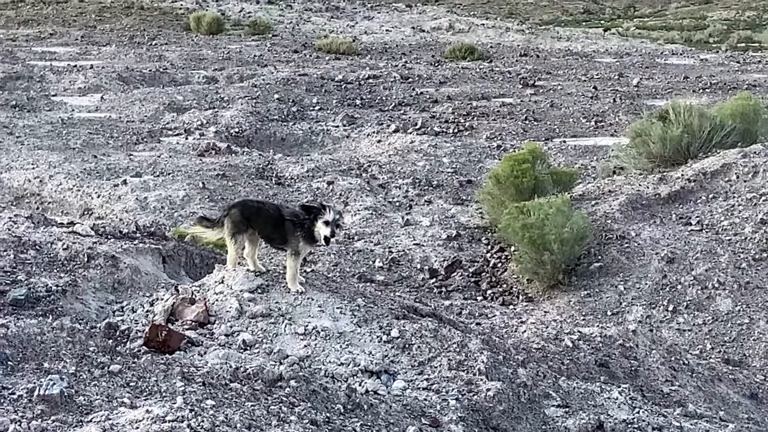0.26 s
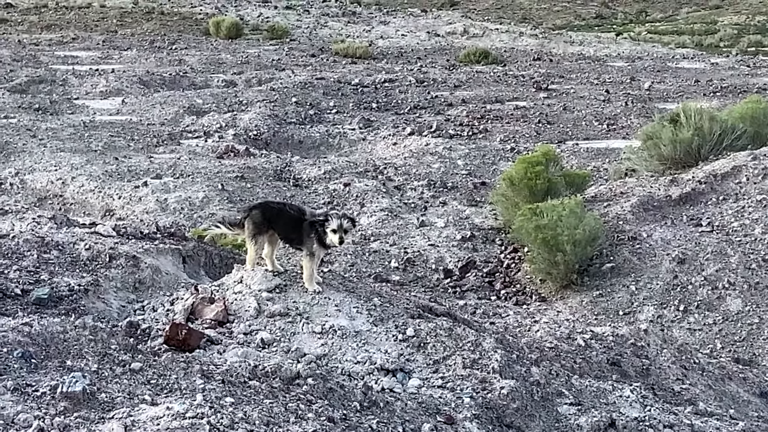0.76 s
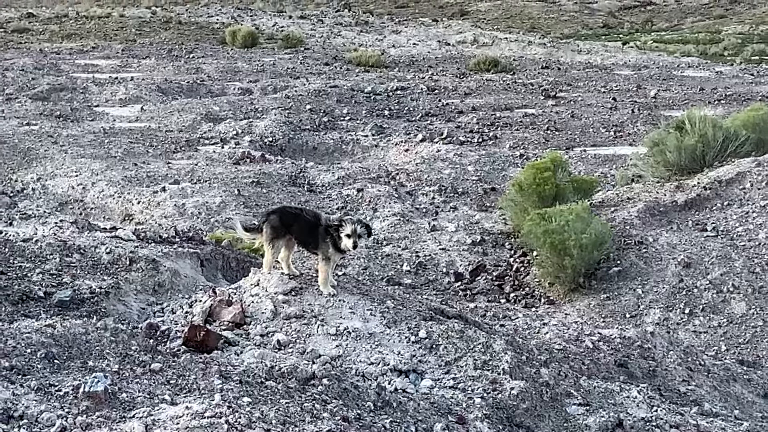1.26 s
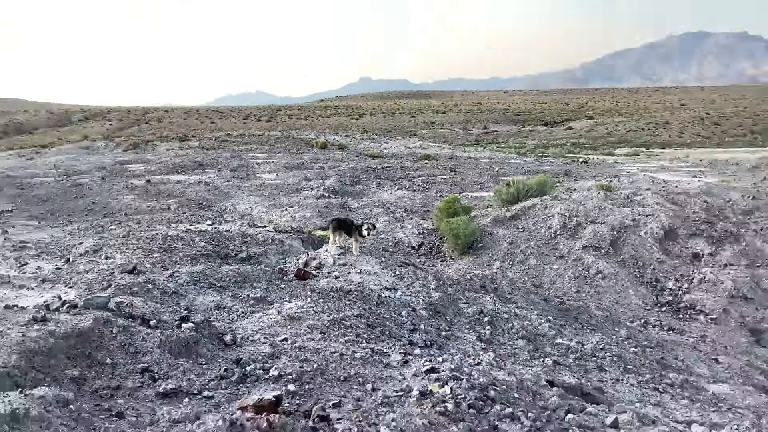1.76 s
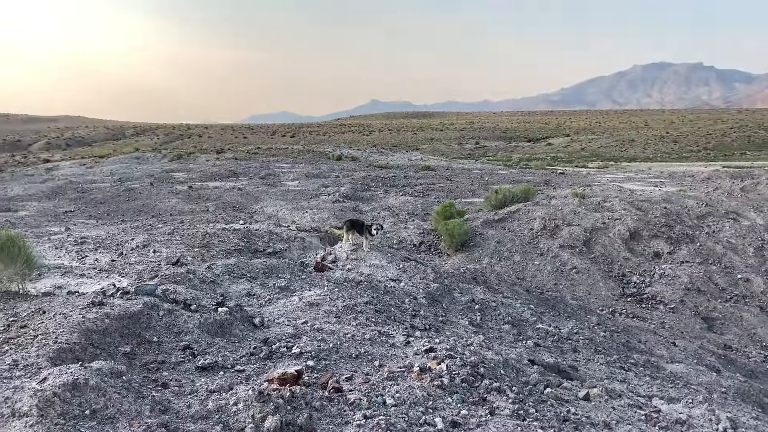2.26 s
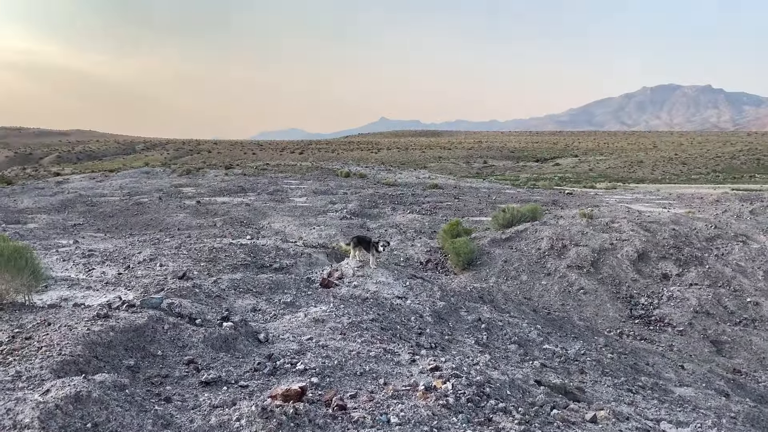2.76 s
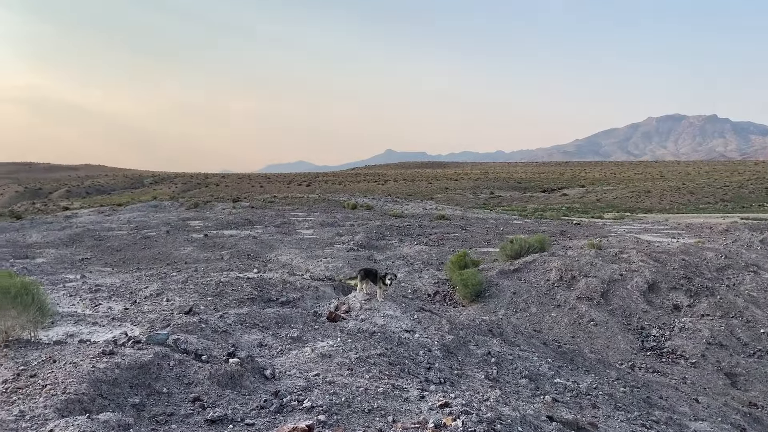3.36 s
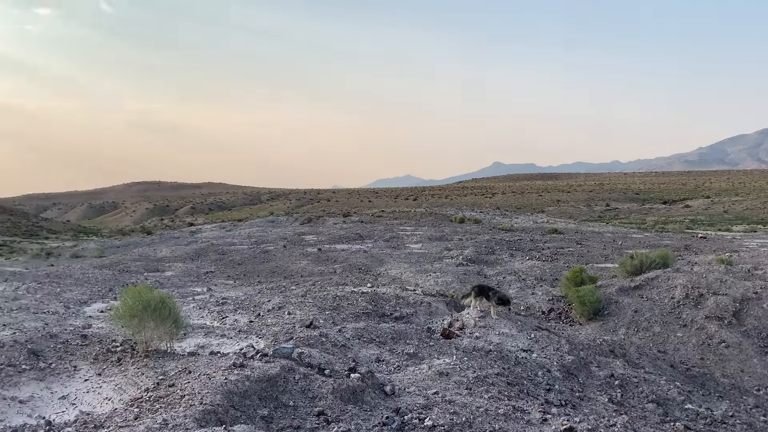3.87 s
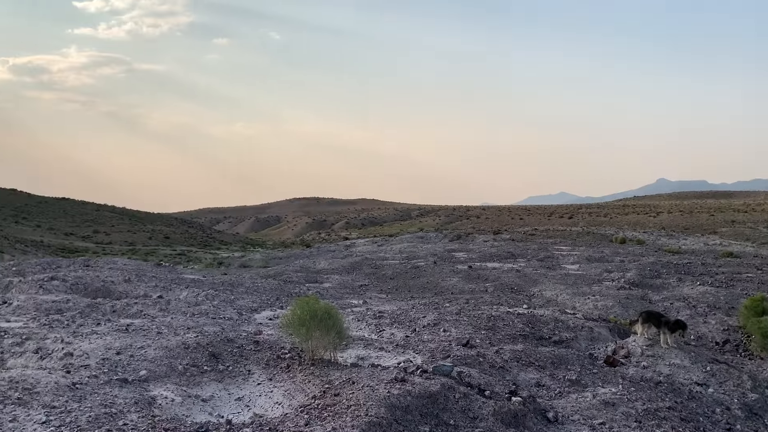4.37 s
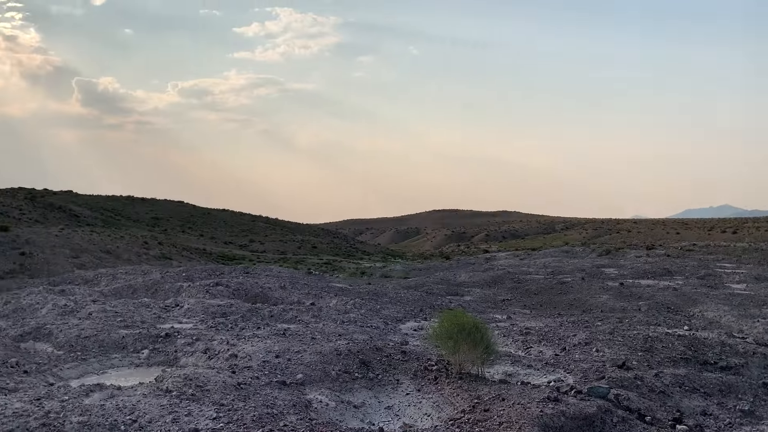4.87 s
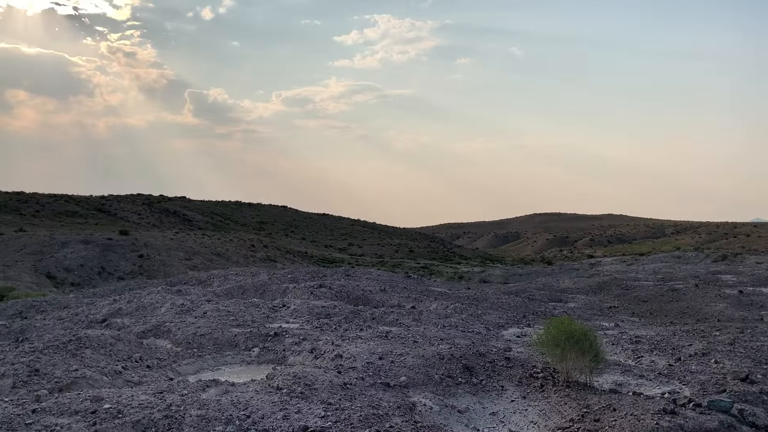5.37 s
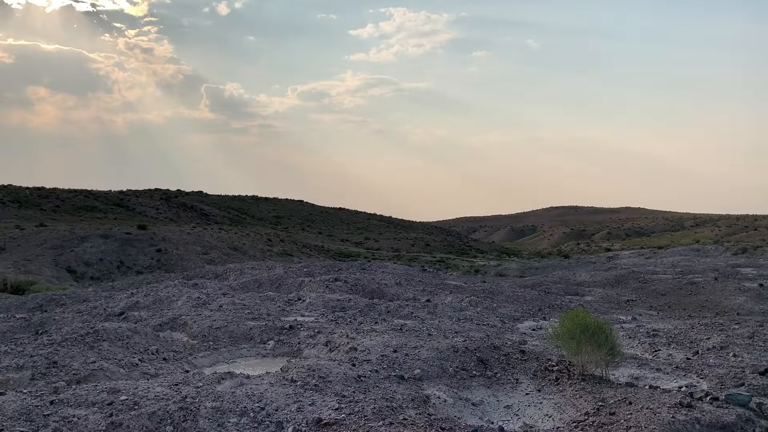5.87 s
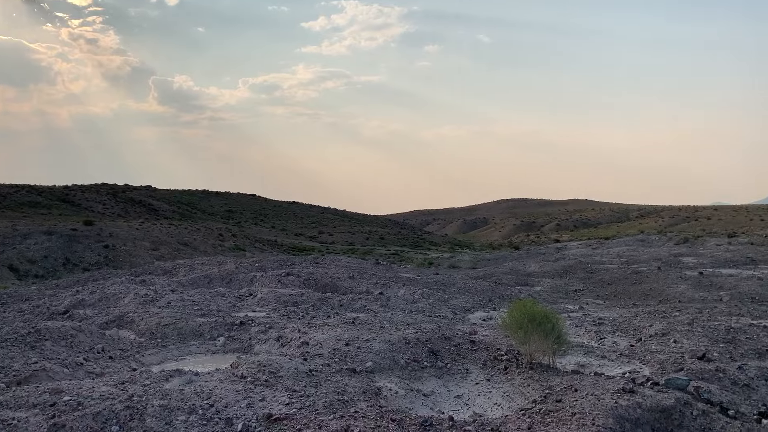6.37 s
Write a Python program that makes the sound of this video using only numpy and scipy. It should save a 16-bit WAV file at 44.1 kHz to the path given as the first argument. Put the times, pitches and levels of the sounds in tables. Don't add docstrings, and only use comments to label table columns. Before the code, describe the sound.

Outdoors on bare stony ground, uneven wind rumbles directly on a hand-held phone microphone. A cluster of thumps comes around one second, then calmer air. A stone clicks at about 2.4 s and a short gravelly crunch with cloth rustle follows just before 3 s. Wind flutters on, drops to a lull, and returns with heavy buffets, the hardest at about 6.1 s. Faint hiss lies beneath.

```python
import sys
import numpy as np
from scipy import signal
from scipy.fft import rfft, irfft, next_fast_len
from scipy.io import wavfile
from scipy.ndimage import uniform_filter1d, minimum_filter1d

SR = 44100
rng = np.random.default_rng(int(sys.argv[2]) if len(sys.argv) > 2 else 0)


def decibels_to_gain(level_db):
    exponent = np.asarray(level_db, float) / 20
    return 10 ** exponent


def materialize(psi):
    bounded = np.clip(np.atleast_2d(psi).T, -1, 1)
    quanta = np.round(bounded * 32767).astype(np.int16)
    wavfile.write(sys.argv[1], SR, quanta)


N = 292383


def evened(x):
    return x / np.sqrt(np.mean(x ** 2) + 1e-20)


def read(points, hz):
    f, value = np.transpose(points)
    return np.interp(np.log(hz + 1), np.log(f + 1), value)


def coloured(x, points):
    size = next_fast_len(x.shape[-1] + 4096)
    gain = decibels_to_gain(read(points, np.fft.rfftfreq(size, 1 / SR)))
    return irfft(rfft(x, size) * gain, size)[..., :x.shape[-1]]


def band(x, lo_hz, hi_hz, order=3):
    return signal.sosfilt(signal.butter(order, [lo_hz, hi_hz], "band", fs=SR, output="sos"), x)


def low_pass(x, hz, order):
    return signal.sosfilt(signal.butter(order, hz, fs=SR, output="sos"), x)


def high_pass(x, hz, order):
    return signal.sosfilt(signal.butter(order, hz, "high", fs=SR, output="sos"), x)


def panned(db):
    return decibels_to_gain(np.array([db / 2, -db / 2]))


def openings(rows, gains):
    out = np.zeros((len(gains[0]), N))
    for row, gain in zip(rows, gains):
        out[:, round(row[0] * SR):round(row[1] * SR)] = gain[:, None]
    return uniform_filter1d(out, size=500, axis=1)


# (frequency [Hz], gain [dB])
HISS_COLOUR = [(300, 6), (900, 3.5), (1400, 6.5), (2300, 5.5), (4000, 0.5), (7000, 1.5), (9000, -1.5),
               (11000, 2), (13500, 0), (16000, -4.5)]
# (start [s], end [s], level [dB])
TOP_HISS_GATES = [
    (0.999, 1.061, -73),
    (1.21, 1.378, -71.5),
    (1.456, 1.561, -81),
    (2.441, 2.549, -81.5),
    (2.575, 2.616, -80),
    (2.641, 2.853, -85.5),
    (3.72, 3.85, -91),
    (5.48, 5.494, -74),
    (6.07, 6.194, -76),
    (6.243, 6.297, -80),
]


def hiss():
    raw = rng.standard_normal((3, N))
    bed = evened(coloured(raw[:2] + 0.13 * raw[2], HISS_COLOUR))
    top = evened(high_pass(bed[:, ::-1], 7900, order=6))
    gate = openings(TOP_HISS_GATES, [decibels_to_gain(np.array([db])) for _, _, db in TOP_HISS_GATES])
    return decibels_to_gain(-78) * bed + gate * top


# (time [s], level [dB])
SCRUB_LEVEL = [(0, -88.5), (1.1, -82), (1.4, -64.5), (1.7, -79.5), (2.2, -79), (2.62, -72.5), (3.4, -74.5),
               (3.86, -71), (3.95, -86.5), (4.42, -74.5), (4.7, -89), (6.63, -83.5)]


def scrub():
    raw = rng.standard_normal((3, N))
    s, db = np.transpose(SCRUB_LEVEL)
    rush = evened(band(raw[2] + .3 * raw[:2], 620, 1300, order=6))
    return decibels_to_gain(np.interp(np.arange(N) / SR, s, db)) * rush


# (start [s], end [s], level [dB], left over right [dB], grit pitch [Hz])
RUSTLES = [(1.022, 1.064, -79.5, -2.7, 3520), (1.221, 1.387, -84, 1, 2980), (1.45, 1.559, -72, -0.5, 4400),
           (1.67, 1.72, -77, -1.3, 3500), (1.73, 1.765, -79, -1, 4100), (1.775, 1.81, -76, -1, 3900),
           (1.866, 2.021, -89, -1, 3480), (2.318, 2.36, -82.5, -10.5, 2610), (2.43, 2.5, -67.5, -1.5, 4150),
           (2.5, 2.56, -70, -1.5, 4150), (2.56, 2.621, -68, -1.5, 4200), (2.638, 2.704, -77.5, -7, 2890),
           (2.72, 2.775, -75, 1, 2900), (2.775, 2.819, -71, 1, 4210), (2.819, 2.836, -62, -1.5, 4600),
           (2.836, 2.853, -50.5, -1.5, 4600), (2.853, 2.867, -58, -1.5, 4600),
           (2.867, 2.902, -79.5, -2.5, 3450), (3.094, 3.16, -81.5, 6.5, 4600),
           (3.275, 3.338, -82.5, 8.5, 4490), (3.57, 3.64, -83, -1, 5900), (3.64, 3.72, -81, -1, 5900),
           (3.72, 3.855, -77, 2, 5600), (4.174, 4.451, -86.5, -5, 4480), (5.844, 5.907, -80.5, 11.5, 4460),
           (6.078, 6.185, -79, 12.5, 3500), (6.243, 6.297, -77, 1.5, 3480)]
# (multiple of the pitch
# [ratio], gain [dB])
GRIT_COLOUR = [(.15, -9), (.5, -4), (.7, -7), (1.1, 0), (1.27, -14), (1.45, -6), (1.76, -11), (2, -3),
               (2.4, -20), (5, -35)]
# (multiple of the pitch [ratio], gain [dB])
CLOTH_COLOUR = [(.2, -14), (.4, -12), (.8, -13), (1, 0), (1.15, -3), (1.35, -6), (1.6, -20), (3, -35)]


def rustle():
    finest_hz, margin = 5000, 200
    level = openings(RUSTLES, [decibels_to_gain(row[2]) * panned(row[3]) for row in RUSTLES])
    grains = rng.standard_normal((2, N)) * decibels_to_gain(1.6 * rng.exponential(1, N))
    grains += 0.057 * grains[::-1]
    for start, end, *_, hz in RUSTLES:
        span = slice(round(start * SR) - margin, round(end * SR) + margin)
        colour = GRIT_COLOUR if hz < finest_hz else CLOTH_COLOUR
        spectrum = [(k * hz, db) for k, db in colour]
        grains[:, span] = evened(coloured(grains[:, span], spectrum))
    smooth = uniform_filter1d(rng.standard_normal(N), size=500)
    patchy = evened(uniform_filter1d(smooth, size=500))
    return decibels_to_gain(4.5 + 1.1 * patchy) * level * grains


# (time [s], peak level [dB], pitch [Hz], half length [s])
PEBBLES = [
    (.281, -78, 1800, .002),
    (.289, -76, 1750, .002),
    (.302, -66, 1700, .003),
    (.317, -72, 1900, .003),
    (1.872, -66, 1700, .002),
    (1.985, -68, 1150, .008),
    (2.357, -48, 1050, .004),
    (2.671, -58, 2600, .003),
    (2.793, -60, 2950, .005),
    (2.844, -44, 1000, .003),
]


def pebbles():
    out, t = np.zeros(N), np.arange(-800, 800) / SR
    noise = rng.standard_normal((len(PEBBLES), len(t)))
    for (s, db, hz, half), raw in zip(PEBBLES, noise):
        rough = evened(band(raw, .7 * hz, 1.35 * hz, order=2))
        knock = np.sin(2 * np.pi * hz * t) + .6 * rough
        swell = np.exp(-(t / max(half, 5e-4)) ** 2)
        out[round(s * SR) - 800:][:len(t)] += decibels_to_gain(db) * knock * swell
    return out * panned(-2.5)[:, None]


# (time [s], peak level [dB], pitch [Hz], left over right [dB], crunch length [s])
STONES = [(0.355, -72, 2300, -0.5, 0.001), (3.096, -62, 2000, 6, .001), (3.118, -66, 1900, 6, .001),
          (1.874, -60, 1610, 6, 0.0027), (2.353, -35.5, 2240, -4.5, 0.0026),
          (2.671, -48, 1950, -3.5, 0.0058), (2.735, -65, 1790, 2, 0.0053), (2.791, -48, 2980, -2.5, 0.0073),
          (2.824, -44, 1570, -9.5, 0.005), (2.8411, -32.5, 1780, -1, 0.0046),
          (2.8426, -39, 3640, 1.5, 0.0027), (5.076, -68, 1640, 7.5, 0.0024)]
# (frequency [Hz], gain [dB])
STONE_COLOUR = [(500, 1), (1500, 4), (3000, 1.5), (6000, -13), (9000, -19), (15000, -23.5)]


def stones():
    out, t = np.zeros((2, N + SR)), np.arange(4000) / SR
    draws = rng.random((len(STONES), 3, len(t)))
    for (s, db, hz, pan_db, length), (chance, left, right) in zip(STONES, draws):
        grains = (chance < .12) * (np.array([left, right]) - .5)
        grit = grains * 2.5 * np.exp(-t / max(length, 1e-3))
        grit[:, 0] = 1
        ring = 0.11 * np.sin(2 * np.pi * hz * t) * np.exp(-t / .0015)
        out[:, round(s * SR):][:, :len(t)] += decibels_to_gain(db) * panned(pan_db)[:, None] * (grit + ring)
    return decibels_to_gain(11.5) * coloured(out[:, :N], STONE_COLOUR)


# (time [s], strength [dB], air speed as body over rumble [dB])
GUSTS = [(0.0, -20, -28.5), (0.499, -26, -23.5), (.9, -22.5, -17), (1.301, -17, -10), (1.73, -28, -14),
         (2.15, -21, -21), (2.45, -27.5, -12.5), (2.72, -19, -10.5), (3.38, -21, -6), (3.48, -25, -21.5),
         (3.849, -21, -14), (4.0, -25.5, -34), (4.552, -21.5, -16.5), (4.68, -39, -16.5),
         (5.199, -34, -28.5), (5.549, -17.5, -9.5), (6.199, -20.5, -8), (6.63, -22, -16.5)]
# (time [s], push [dB], speed-up [dB], fall [s])
SWELLS = [(.41, 4.5, 4, 0.072), (.56, 0, -7.5, 0.03), (.66, -0.7, 19.5, .025), (1.02, 4.5, -1.5, 0.011),
          (1.46, 11, 0.9, 0.079), (5.69, -3, -11.5, 0.073), (1.938, 3, 10, 0.032), (2.231, -1, 13.5, 0.072),
          (2.421, -3.8, -7.5, 0.044), (2.574, 20.5, -13, 0.013), (2.861, -9, -4, 0.066),
          (6.42, 0.1, -2, 0.091), (3.12, 3.5, -7, 0.028), (3.615, 2, 6, 0.018), (3.82, 3, 7, 0.028),
          (4.171, 0.6, 16.5, 0.1), (4.3, 3.5, 6, 0.023), (0.151, -10, -5, 0.029), (4.45, 4.5, -19, .03),
          (4.51, -7.5, 3, .03), (4.765, 3, 14, 0.025), (4.919, -0.5, -27.5, 0.056), (5.056, 15, 0, 0.02),
          (5.278, 11, 16, 0.011), (5.778, -27, -1, 0.037), (5.853, 9.5, 1, 0.026), (5.931, -6, 16.5, 0.015),
          (5.968, 11, -12, 0.013), (6.145, 11, 7, 0.022), (6.26, 8.5, -4, 0.026)]


def airflow(t):
    s, strength, speed = np.transpose(GUSTS)
    at, push, faster, fall = np.transpose(SWELLS)[:, :, None]
    fall = np.clip(fall, .008, .2)
    rise = 0.89 * fall
    shape = np.exp(-((t - at) / np.where(t < at, rise, fall)) ** 2)
    return np.interp(t, s, strength) + (push * shape).sum(0), np.interp(t, s, speed) + (faster * shape).sum(0)


def turbulence():
    hop, size, bins = 128, 1024, 90
    frames, hz = N // hop + 9, np.fft.rfftfreq(size, 1 / SR)[:, None]
    rumble, speed = airflow(np.arange(frames) * hop / SR)
    body = speed - 5.0
    roar = -36 + 0.98 * speed + .6 * (rumble + 22)
    low = body * np.clip(np.log(hz / 75 + 1e-9) / np.log(215 / 75), 0, 1)
    mid = (roar - body) * np.clip(np.log(hz / 215 + 1e-9) / np.log(630 / 215), 0, 1)
    skirt = -np.maximum(hz - 630, 0) * (.014 - 0.0026 * roar)
    spray = -21 + 0.55 * (roar + 40) - 0.08 * np.maximum(hz - 1300, 0)
    skirt = np.maximum(skirt, spray).clip(max=0)
    flicker = np.tanh(evened(uniform_filter1d(rng.standard_normal(frames), size=4)))
    lumps = (1.2 + 2.0 * np.clip(hz / 450, 0, 1)) * flicker
    level = rumble + low + mid + skirt + lumps - 3.5
    real, imaginary = rng.standard_normal((2, frames, 2, bins)).transpose(0, 2, 3, 1)
    z = np.zeros((2, len(hz), frames), complex)
    z[:, :bins] = (real + 1j * imaginary) * decibels_to_gain(level)[:bins]
    return 2 * signal.istft(z, nperseg=size, noverlap=size - hop)[1][:, :N]


def choppy(x):
    low = signal.sosfiltfilt(signal.butter(2, 190, fs=SR, output="sos"), x)
    chop = signal.sosfiltfilt(signal.butter(4, 55, fs=SR, output="sos"), rng.standard_normal(N))
    return low + (x - low) * decibels_to_gain(9.5 * np.tanh(evened(chop)) - 3.0)


# (time [s], force [dB], bulk over force [dB], snap over force [dB])
BURSTS = [(1, -22.5, 12.5, -24), (1.006, -23.5, 9.5, -17.5), (1.214, -29.5, 1.5, -22.5),
          (1.295, -29.5, 4.5, -17), (1.311, -30, 6.5, -4.5), (1.421, -29, 10, -31), (1.446, -14.5, -3, -12),
          (1.474, -18.5, 2, -17.5), (1.489, -16.5, 5.5, -14), (1.51, -29, 13, -18.5),
          (2.218, -25, 0.5, -25), (2.229, -25.5, 3.5, -33), (2.323, -33, 6.8, -17.5), (2.56, -24, 0.5, -40),
          (2.619, -26, 13, -25), (2.685, -30.5, 15.5, -35.5), (2.754, -29.5, 6.5, -19),
          (3.098, -29.5, 6.5, -30), (5.275, -28.5, 9, -16.5), (5.52, -32, 13.5, -33), (5.55, -16.5, 2, -23),
          (5.843, -24.5, 15, -31), (5.886, -24.5, 5.5, -20), (5.905, -25.5, 2, -21.5),
          (5.952, -25.5, -3.5, -19), (6.09, -15.5, 7, -2), (6.106, -1, -1.5, -12), (6.122, -24, 2.5, -18.5),
          (6.138, -16, -20, -29.5), (6.241, -18.5, 5.5, -16.5)]
# (time [s], force [dB], bulk over force [dB], half length [s])
ROUND_EDDIES = [(0.916, -32.5, 15.5, 0.0056), (.977, -34.5, 24, 0.0014), (1.121, -36.5, 11.5, 0.0027),
                (1.194, -31, -3, 0.0048), (1.28, -39.5, 19, 0.0028), (1.393, -39, 21, 0.0044),
                (1.41, -34, 17, .0022), (1.54, -31, 13, 0.0026), (1.884, -41.5, 16.5, 0.0031),
                (2.292, -33, 9, 0.006), (2.638, -33, 5.5, 0.0013), (2.708, -30, 7.5, 0.0062),
                (2.729, -30, 8, 0.006), (2.786, -32, 5, 0.01), (2.954, -31.5, 1, 0.002),
                (2.974, -29, 13, 0.0043), (3.069, -35, 11, 0.0017), (3.118, -31, 6, 0.0058),
                (3.183, -33.5, 14, 0.0033), (3.365, -35.5, 14, 0.0043), (3.393, -37, .1, 0.0031),
                (4.47, -37, 10, .0033), (5.444, -29, 8.5, 0.0068), (5.466, -31, -17, 0.0063),
                (5.536, -21.5, -4, 0.0024), (5.592, -29, 13.5, 0.0028), (5.931, -36.5, 20.5, 0.0052),
                (6.077, -26, 8.5, 0.0045), (6.153, -23.5, 2, 0.0054), (6.233, -37.5, 17.5, 0.011)]
# (time [s], force [dB], bulk over force [dB])
FLUTTERS = [(0.093, -66, 34.5), (0.64, -64, 28.5), (0.22, -64.5, 29.5), (0.813, -49, 20.5),
            (1.32, -39, 6.5), (5.353, -60, 27), (4.301, -49, 11.5), (1.761, -62, 30.5), (1.96, -56, 20),
            (2.29, -33.5, 5), (6.618, -45, 15), (3.009, -55, 22), (3.221, -44, 13.5), (3.258, -39.5, 8.5),
            (3.39, -42.5, 19.5), (3.607, -61, 27.5), (3.743, -48, 21), (3.617, -54, 29), (3.863, -41, 18),
            (6.545, -55, 19), (4.244, -38.5, 11), (4.625, -60.5, 20.5), (4.389, -43, 9.5), (4.44, -42, 13),
            (4.571, -43, 12), (5.633, -56, 27.5), (6.042, -43, 21), (6.181, -32, 16), (6.314, -58.5, 15),
            (6.573, -47, 24)]
# (time [s], force [dB], bulk over force [dB])
RIPPLES = [(1.108, -47, 8), (1.181, -39, 4), (1.25, -38, 6), (1.353, -46, 8), (1.901, -49, 12),
           (1.942, -48, 10), (2.161, -48, 10), (2.196, -42, 6), (2.335, -40, 8), (2.672, -36, 0),
           (2.815, -47, 4), (2.903, -48, 6), (2.982, -35, 4), (3.046, -41, 2), (3.061, -42, 8),
           (3.164, -40, 3), (3.192, -36, 10), (3.232, -38, 8), (3.274, -40, 6), (3.316, -46, 6),
           (3.334, -36, 8), (3.426, -47, 2), (3.815, -39, 14), (4.204, -50, 12), (4.414, -47, 6),
           (5.434, -38, 4), (5.506, -39, 4), (5.831, -41, 10), (6.019, -46, 8), (6.21, -41, 8),
           (6.287, -46, 12), (1.235, -42, 6), (1.432, -32, 4), (1.5, -30, 4), (6.27, -44, 10)]
# (time [s], level [dB], edge under level [dB])
PATS = [(.052, -40, 26), (.174, -43, 30), (.341, -43, 30), (.392, -37, 32), (.449, -33, 32),
        (.474, -40, 30), (.793, -37, 26), (.87, -33, 22), (.944, -25, 22), (1.599, -35, 22),
        (1.646, -33, 22), (1.741, -37, 26), (2.053, -35, 24), (2.104, -39, 26), (2.487, -41, 28),
        (3.676, -38, 26), (3.718, -36, 24), (4.075, -45, 30), (4.137, -35, 24), (4.741, -43, 32),
        (5.047, -40, 30), (5.375, -34, 24), (5.4, -36, 24), (5.868, -23, 18), (2.34, -32, 18),
        (6.32, -31, 30), (6.355, -35, 28), (6.382, -30, 32), (6.409, -34, 30), (6.438, -32, 32),
        (6.469, -30, 30)]


def eddies():
    round_snap_db, lag_s = -33, .003
    rows = [(*row, .004) for row in BURSTS]
    rows += [(s, db, bulk, round_snap_db, half) for s, db, bulk, half in ROUND_EDDIES]
    rows += [(*row, round_snap_db, .0052) for row in FLUTTERS]
    rows += [(s + lag_s, db, bulk, round_snap_db, .0022) for s, db, bulk in RIPPLES]
    rows += [(s + lag_s, db - under, under, round_snap_db, .0035) for s, db, under in PATS]
    s, force, bulk, snap, half = np.transpose(rows)[:, :, None, None]
    # (level [dB], low edge [Hz], high edge [Hz], lag [s], stretch [ratio])
    layers = ((1.2 * (force + snap) - 14, 2050, 3600, -.001, .55),
              (force + snap - 2.5, 1220, 1900, -.002, .8),
              (force + 0.28 * snap - 3.5, 820, 1300, -.001, 1.05),
              (force - .6, 460, 820, 0, 1.15),
              (force + bulk - 1.1, 230, 470, .002, 1.3),
              (force + bulk - .6, 100, 230, .005, 1.8))
    out, t = np.zeros((2, N + SR)), np.arange(-900, 1500) / SR
    settle = 600
    noise = rng.standard_normal((len(rows), len(layers), 2, len(t) + settle)).swapaxes(0, 1)
    puffs, fade = 0, signal.windows.tukey(len(t), .4)
    for raw, (db, lo_hz, hi_hz, lag, stretch) in zip(noise, layers):
        width = stretch * np.clip(half, .0015, .012) + 0.00011
        swell = np.exp(-((t - lag) / width) ** 2)
        wake = decibels_to_gain(-20) * np.exp(-abs(t - lag) / np.where(t < lag, .004, .014))
        shape = (swell + wake) * fade
        leaning = low_pass(raw, 1.136 * lo_hz, order=2)
        puff = band(leaning, lo_hz, hi_hz, order=4)[..., settle:] * shape
        even = np.sqrt((shape ** 2).sum(-1) / 2 / (puff[:, :1] ** 2).sum(-1))[..., None]
        puffs = puffs + decibels_to_gain(db) * even * puff
    for at, puff in zip(s.ravel(), puffs):
        out[:, round(at * SR):][:, :len(t)] += puff
    return low_pass(out[:, 900:N + 900], 2900, order=3)


def wind():
    near, other = choppy(turbulence()) + eddies()
    near = high_pass(near, 48, order=3)
    port_hz = 10980
    whistle = evened(band(rng.standard_normal(N), port_hz - 150, port_hz + 150, order=2))
    whistle *= decibels_to_gain(-61.5) * abs(uniform_filter1d(abs(near), size=500)) ** 1.3
    sheltered = .3 * np.roll(near, 5) + .1 * other
    return np.array([near, sheltered]) + whistle


def scene():
    start = np.minimum(np.arange(N) / 300 + .3, 1)
    return hiss() + scrub() + rustle() + pebbles() + stones() + start * wind()


# (frequency [Hz], gain [dB])
PORT_SUM = [(4900, 0.5), (5350, -6), (5900, 0.5), (7000, -0.5), (8000, -2.5), (8600, -9), (9400, 1),
            (12100, 0.5), (13300, -20.5), (14500, -2), (15500, 2)]
# (frequency [Hz], gain [dB])
PORT_DIFFERENCE = [(5500, -2), (6600, -3), (8600, 6), (10100, 0.5), (10500, -31.5), (11700, -32),
                   (12100, 1), (14800, 0), (15300, -33.5)]


def guarded_ports(dry):
    mono_hz, size = 820, next_fast_len(N + 4096)
    kept = 1 / (1 + (mono_hz / (np.fft.rfftfreq(size, 1 / SR) + 1)) ** 8)
    side = irfft(rfft(dry[0] - dry[1], size) * kept, size)[:N] / 2
    mid = coloured(dry[0] - side, PORT_SUM)
    side = coloured(side, PORT_DIFFERENCE)
    return np.array([mid + side, mid - side])


def limited(x):
    room = minimum_filter1d(np.minimum(.9 / (abs(x).max(0) + 1e-9), 1), size=401)
    return x * uniform_filter1d(uniform_filter1d(room, size=200), size=200)


def top_cut(x):
    return signal.sosfilt(signal.butter(12, 15700, fs=SR, output="sos"), x)


def record(dry):
    mix = limited(guarded_ports(dry))
    return top_cut(mix)


dry = scene()
out = record(dry)
materialize(out)
```